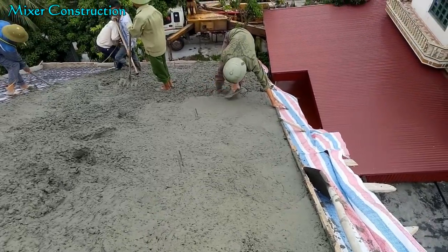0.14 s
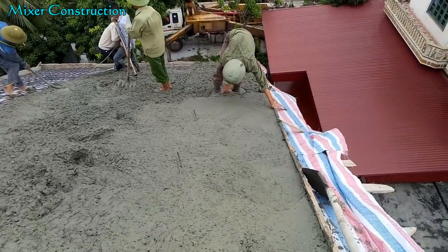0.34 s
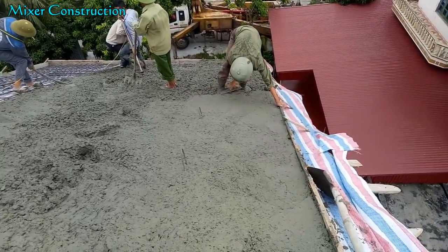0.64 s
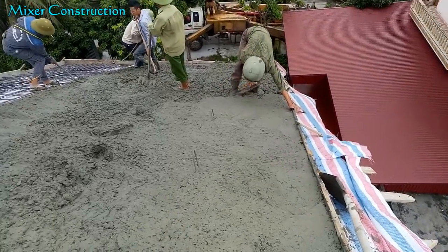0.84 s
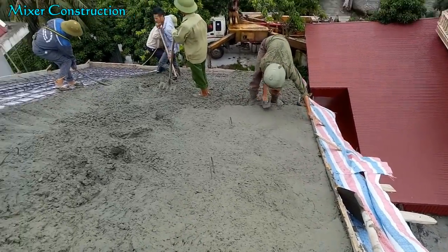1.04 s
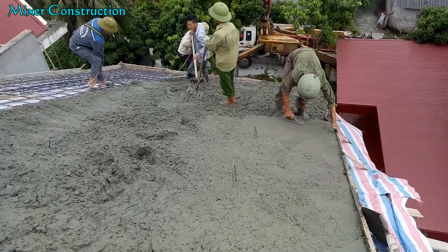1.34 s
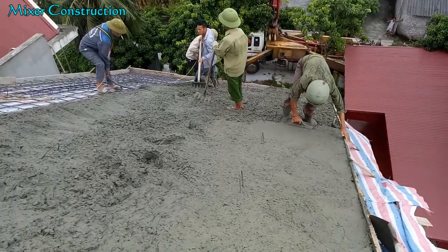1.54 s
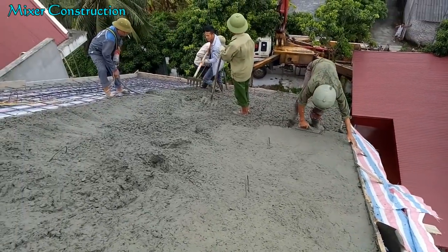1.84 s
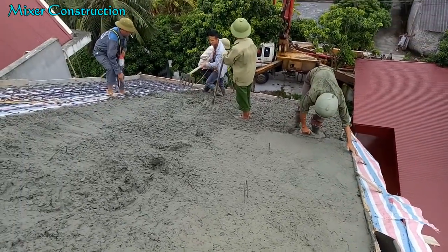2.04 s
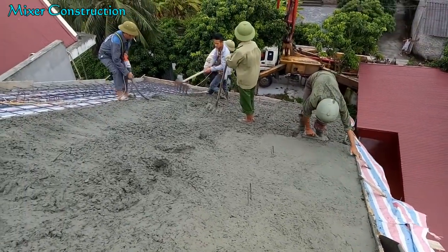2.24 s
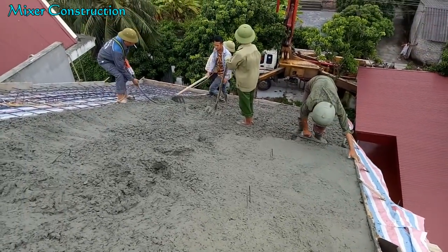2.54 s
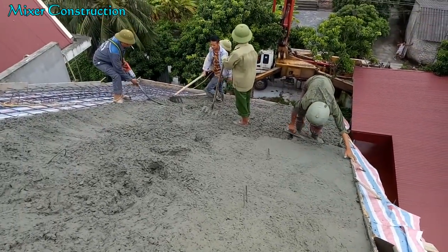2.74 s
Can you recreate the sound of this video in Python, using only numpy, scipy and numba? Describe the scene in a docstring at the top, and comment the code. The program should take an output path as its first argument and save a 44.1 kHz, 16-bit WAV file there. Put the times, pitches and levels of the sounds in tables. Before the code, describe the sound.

A concrete vibrator drones with a clear low hum and metallic rattle outdoors, slides down in pitch as it bogs, then revs back up; wind thumps the stereo microphone, whose right side grows muffled.

```python
"""A poker vibrator hums on a roof slab, slows as it sinks into wet concrete and climbs back towards speed.
Its eccentric sings a clean tone with overtones; a motor whine rides above; noise rattles in resonances.
Wind buffets two microphone ports; the right one is gradually covered and grows dull.
Late on come narrow-band gliding squeaks and short broad-band scrapes, each under a brief envelope."""
import sys
import numpy as np
from scipy import signal
from scipy.io import wavfile
from scipy.ndimage import uniform_filter1d, map_coordinates
from numba import njit

SR = 44100
rng = np.random.default_rng(int(sys.argv[2]) if len(sys.argv) > 2 else 0)


def undo_db(level):
    """Turn decibels back into plain size, where 20 dB means ten times bigger."""
    steps = np.asarray(level, float) / 20
    return 10 ** steps


def dump_mix(stems):
    """Bounce the given channels to the path in sys.argv[1] as a 16-bit WAV at rate SR."""
    frames = np.atleast_2d(stems).T  # one column per channel
    limited = np.clip(frames, -1, 1)  # hard clip at full scale
    pcm = np.round(limited * 32767).astype(np.int16)
    wavfile.write(sys.argv[1], SR, pcm)


N = 127890
TIME_S = np.arange(N) / SR

# Machine, squeak and scrape levels are ahead of the port gains; wind, buffets and hiss are added after them.
# Eccentric. Each row: time in seconds, mean rotation rate in Hz, tone in dB, octave in dB.
ECCENTRIC = [(0, 221.8, -25, -35), (.16, 220.4, -21, -41), (.8, 218.9, -17, -43.5),
             (.95, 217.2, -15.5, -38.5), (1.3, 216.3, -16, -34), (1.34, 215.6, -20, -34),
             (1.44, 213.3, -18, -28), (1.62, 214.3, -14.5, -41.5), (1.7, 200, -19.5, -35.5),
             (1.74, 193.3, -20, -39.5), (1.78, 185.2, -27, -33.5), (1.87, 170, -27, -38),
             (1.95, 158.9, -32.5, -38.5), (2.05, 143.9, -34, -35), (2.14, 129.5, -49, -53),
             (2.22, 122.9, -40, -38), (2.3, 149, -52, -41), (2.35, 161.8, -33.5, -50.5),
             (2.46, 187.4, -28, -46), (2.62, 203.8, -23.5, -46), (2.66, 206.1, -20.5, -36),
             (2.71, 201.1, -23, -35), (2.74, 207.5, -20.5, -30), (2.9, 211.3, -18, -37)]
# Upper overtones. Each row: time in seconds, third partial in dB, fourth partial in dB.
UPPER_PARTIALS = [(0, -42, -47), (.25, -40, -38.5), (.55, -40, -46), (.8, -40, -46.5), (.95, -62, -39.5),
                  (1.3, -41.5, -54.5), (2.1, -61, -54), (2.9, -48, -42)]
# Motor whine. Each row: time in seconds, level in dB.
WHINE_LEVEL = [(0, -45), (.9, -52), (1.3, -56.5), (1.6, -76)]
# Shaft and casing resonances. Each row: centre in Hz, nominal width in Hz, weight in dB.
RESONANCES = [(300, 72, -1), (654, 91, 1), (843, 130, 1.5), (1121, 258, 4), (1538, 160, -0.5),
              (1850, 290, -1.5), (1847, 58, -0.5), (2130, 500, -3), (2840, 640, 0.5), (3350, 990, -4.5),
              (4120, 780, -8.5), (5000, 1400, -18), (7000, 1500, -23)]
# Rattle course. Each row: time in seconds, level in dB, tilt in dB per octave about 1500 Hz.
RATTLE_LEVEL = [(0, -35, 1.5), (.5, -34.5, -0.5), (.72, -35, -0.25), (1.5, -35, -1.5), (1.8, -34, 0.5),
                (2.34, -34, 0.5), (2.5, -33.5, 2), (2.9, -34, -1)]
# Extra weight of the resonances near 1850 Hz. Each row: time in seconds, weight in dB.
RING_WEIGHT = [(0, -5), (1.2, 0), (1.5, 2), (2.05, -0.5), (2.3, -4.5), (2.65, 4.5)]
# Wind push. Each row: time in seconds, left port in dB, right port in dB.
WIND_LEVEL = [(0, -39, -13), (.12, -30.5, -18), (.22, -37, -24), (.33, -31.5, -17), (.45, -28.5, -23),
              (.54, -33.5, -23), (.68, -52.5, -17), (.76, -32, -28.5), (.95, -45, -26), (1.4, -35, -33),
              (1.65, -42, -35.5), (1.75, -33.5, -30.5), (1.86, -30, -32), (1.96, -28.5, -35),
              (2.04, -37.5, -29.5), (2.2, -30.5, -32), (2.33, -31, -31.5), (2.6, -23.5, -35),
              (2.7, -32, -28.5), (2.9, -39, -56)]
# Buffets on the right port. Each row: centre in seconds, half the peak in dB, frequency in Hz.
RIGHT_BUFFETS = [(0.039, -38, 250), (.1, -23, 219), (0.308, -18, 250), (0.354, -15, 360), (0.657, -15, 156),
                 (0.676, -21, 171), (0.928, -12, 300), (1.752, -15.5, 173), (2.147, -18.5, 149),
                 (2.196, -25, 148), (2.278, -19.5, 130), (2.481, -14.5, 148)]
# Squeaks. Each row: centre in seconds, length in seconds, from in Hz, to in Hz, level in dB.
SQUEAK_GLIDES = [(2.338, 0.12, 2450, 2700, -38), (2.376, 0.12, 3700, 4480, -44)]
# Scrapes. Each row: start in seconds, level in dB, length in seconds.
SCRAPE_BURSTS = [(2.562, -39, .02), (2.599, -29, .014), (2.617, -32, .02)]
# Left treble. Each row: time in seconds, share of rattle passing near 5 kHz in dB, thin hiss in dB.
LEFT_TREBLE = [(1.5, -20.5, -110), (1.8, -14.5, -80.5), (1.97, -14.5, -68), (2.25, -16, -81.5),
               (2.55, -2.5, -77.5), (2.68, -19, -66.5), (2.8, -10.5, -75.5)]
# Right port. Each row: time in seconds, corner of each low-pass in Hz, gain in dB,
# lead ahead of the low-passes in samples.
RIGHT_PORT = [(0, 9500, 4, 19), (.6, 8500, 1, 18.56), (.9, 4600, 2.5, 16.8), (1.15, 2000, -0.5, 23.6),
              (1.4, 950, -1.5, 29), (1.7, 760, -2.5, 21), (2., 600, -3.5, 26), (2.5, 600, -12.5, 39),
              (2.9, 680, -10, 49)]
# Machine noise reaching the right port. Each row: time in seconds, gain in dB.
RIGHT_NOISE_GAIN = [(0, 3), (.09, -1), (.23, 4), (.35, -2), (.5, 3.5), (.65, 1), (.69, -4)]

SPEED_WAVER_RATIO, TONE_FLICKER_DB, UPPER_FLICKER_DB = 0.0027, 0.52, 2.5
LABOUR_DB = 5.0  # extra flicker of the tone at half of top speed
WHINE_PER_TURN, WHINE_FLICKER_DB = 16.33, 3
GATE_DEPTH, GATE_DECAY_TURNS = 0.25, 0.31
PORT_UNLIKENESS = 0.47  # each port's own noise against the common noise
BAND_SWELL_DB, BAND_FLICKER_DB, RING_HZ = 1.0, 1.5, 1850.0
# pairs: left port, right port
WIND_HZ, WIND_WIDTH_HZ, GUST_DB = (92, 136.4), (115, 120), (2.0, 3.0)
GUSTS_PER_S, WIND_TOP_HZ, RUMBLE_HZ, RUMBLE_DB = 35.0, 600.0, 37.3, -42.5
BUFFET_CYCLES = 0.45
SQUEAK_WIDTH_HZ, SCRAPE_HZ, SCRAPE_WIDTH_HZ = 130.0, 1100.0, 1500.0
BOTH_PORTS_DB, RIGHT_TONE_DB, LEFT_TOP_HZ = 3.5, -6.5, 3726
AIR_HZ, AIR_WIDTH_HZ, TREBLE_SWING_DB = 5230, 1500, 2.5
HISS_HZ, HISS_WIDTH_HZ = 10700.0, 500.0


def columns(rows):
    """Every column after the first as a straight-line curve over time."""
    rows = np.array(rows, float)
    return [np.interp(TIME_S, rows[:, 0], c) for c in rows[:, 1:].T]


def unit(x):
    """Scales to an rms of 1."""
    return x / np.sqrt(np.mean(x ** 2))


@njit
def svf(x, hz, width):
    """State-variable filter with moving centre; returns band and low outputs."""
    band, low = np.empty(len(x)), np.empty(len(x))
    b, l = 0., 0.
    for i in range(len(x)):
        g = np.tan(np.pi * hz[i] / SR)
        k = width[i] / hz[i]
        v = (b + g * (x[i] - l)) / (1 + g * (g + k))
        low[i] = l + g * v
        band[i] = k * v
        b = 2 * v - b
        l = 2 * low[i] - l
    return band, low


def ring(x, hz, width_hz):
    """A resonance applied twice, steep on both sides."""
    hz = hz + np.zeros(N)
    stage_width_hz = 1.452 * width_hz + np.zeros(N)  # two passes narrow the band
    once = svf(x, hz, stage_width_hz)[0]
    return svf(once, hz, stage_width_hz)[0]


def walk(rate_per_s):
    """Random levels, held and then slewed; spread near 1."""
    hold = int(SR / rate_per_s)
    steps = np.repeat(rng.standard_normal(N // hold + 1), hold)
    return 1.46 * uniform_filter1d(uniform_filter1d(steps, hold), hold)[:N]


def tones(hz, turns):
    """The eccentric's tone, one cycle a turn, flickering more when slowed, with flickering overtones."""
    _, tone_db, octave_db = columns(ECCENTRIC)
    third_db, fourth_db = columns(UPPER_PARTIALS)
    flicker_db = TONE_FLICKER_DB + LABOUR_DB * 2 * (1 - hz / hz.max())
    out = undo_db(tone_db + flicker_db * walk(29.975)) * np.sin(2 * np.pi * turns)
    partials = ((2, octave_db, 0.5), (3, third_db, 1), (4, fourth_db, 1))
    for multiple, db, flicker_share in partials:
        level = undo_db(db + UPPER_FLICKER_DB * flicker_share * walk(45))
        out += level * np.cos(2 * np.pi * multiple * turns)
    return np.sqrt(2) * out


def whine(turns):
    """A thin motor whine locked to the rotation, quivering fast, that fades."""
    level = undo_db(columns(WHINE_LEVEL)[0] + WHINE_FLICKER_DB * walk(60))
    return np.sqrt(2) * level * np.sin(2 * np.pi * WHINE_PER_TURN * turns)


def rattle(turns):
    """Noise partly gated once a turn, through shaft and casing resonances; two partly alike copies."""
    level_db, tilt = columns(RATTLE_LEVEL)
    ring_db = columns(RING_WEIGHT)[0]
    gate = 1 - GATE_DEPTH + GATE_DEPTH * unit(np.exp(-(turns % 1) / GATE_DECAY_TURNS))
    out = np.zeros((2, N))
    for hz, width_hz, weight_db in RESONANCES:
        common, left, right = rng.standard_normal((3, N))
        gain_db = weight_db + ring_db * (abs(hz - RING_HZ) < 150) + tilt * np.log2(hz / 1500)
        gain_db = gain_db + BAND_SWELL_DB * walk(4.8) + BAND_FLICKER_DB * walk(16)
        bands = [ring(gate * (common + PORT_UNLIKENESS * own), hz, width_hz) for own in (left, right)]
        out += undo_db(gain_db) * np.array(bands) / np.sqrt(width_hz / 200)
    return unit(out) * undo_db(level_db)


def wind():
    """Unrelated gusty low noise on each port, over a steady deep rumble."""
    out = []
    soften = signal.butter(2, WIND_TOP_HZ, fs=SR, output="sos")
    for db, hz, width_hz, gust_db in zip(columns(WIND_LEVEL), WIND_HZ, WIND_WIDTH_HZ, GUST_DB):
        push = rng.standard_normal(N) * undo_db(db + gust_db * walk(GUSTS_PER_S))
        push = signal.sosfilt(soften, ring(push, hz, width_hz)) * np.sqrt(SR / 2 / width_hz)
        rumble = ring(rng.standard_normal(N) * undo_db(RUMBLE_DB), RUMBLE_HZ, RUMBLE_HZ)
        out.append(push + rumble * np.sqrt(SR / 2 / RUMBLE_HZ))
    return np.array(out)


def buffets():
    """Sharp blows of wind on the right port: about one cycle under a bell-shaped envelope."""
    out = np.zeros(N)
    for centre_s, db, hz in RIGHT_BUFFETS:
        cycles = (TIME_S - centre_s) * hz
        bell = np.exp(-(cycles / BUFFET_CYCLES) ** 2)
        out += 2 * undo_db(db) * bell * np.cos(2 * np.pi * cycles + 1)
    return out


def squeaks():
    """Soft, wavering squeaks, narrow noise gliding up as the shaft picks up."""
    out = np.zeros(N)
    for centre_s, length_s, from_hz, to_hz, db in SQUEAK_GLIDES:
        u = (TIME_S - centre_s) / length_s
        hz = from_hz + (to_hz - from_hz) * np.clip(u + 0.5, 0, 1)
        noise = unit(ring(rng.standard_normal(N), hz, SQUEAK_WIDTH_HZ))
        out += undo_db(db) * np.exp(-(2 * u) ** 2) * noise
    return out


def scrapes():
    """Short rasps of a tool on the slab: broad-band noise starting and stopping sharply."""
    envelope = np.zeros(N)
    for start_s, db, length_s in SCRAPE_BURSTS:
        half_s = length_s / 2
        envelope += undo_db(db) * np.exp(-((TIME_S - start_s - half_s) / half_s) ** 4)
    return envelope * unit(ring(rng.standard_normal(N), SCRAPE_HZ, SCRAPE_WIDTH_HZ))


def left_port(tone, noise, shaft):
    """Sound cut steeply at the port's top, plus a share of rattle treble that rises and falls, and a hiss."""
    share_db, hiss_db = columns(LEFT_TREBLE) + TREBLE_SWING_DB * walk(22)
    steep = signal.cheby1(5, .3, LEFT_TOP_HZ, fs=SR, output="sos")
    low = signal.sosfiltfilt(steep, tone + noise)
    air = undo_db(share_db) * ring(shaft, AIR_HZ, AIR_WIDTH_HZ)
    hiss = undo_db(hiss_db) * unit(ring(rng.standard_normal(N), HISS_HZ, HISS_WIDTH_HZ))
    return (low + air) * undo_db(BOTH_PORTS_DB) + hiss


def right_port(tone, noise):
    """Sound read ahead, then dulled by three low-passes whose corner falls as the port is covered."""
    corner_hz, gain_db, lead = columns(RIGHT_PORT)
    mix = tone * undo_db(RIGHT_TONE_DB) + noise * undo_db(columns(RIGHT_NOISE_GAIN)[0])
    out = map_coordinates(mix, [np.arange(N) + lead], mode="nearest")
    for damping in (1.5, 2.2, 1.):
        out = svf(out, corner_hz, damping * corner_hz)[1]
    return out * undo_db(gain_db + BOTH_PORTS_DB)


def scene():
    """One rotation drives tone, whine and rattle; each port filters the machine, then wind is added."""
    hz = columns(ECCENTRIC)[0] * (1 + SPEED_WAVER_RATIO * walk(12))
    turns = np.cumsum(hz) / SR
    tone = tones(hz, turns)
    shaft = rattle(turns)
    noise = shaft + whine(turns) + squeaks() + scrapes()
    ports = np.array([left_port(tone, noise[0], shaft[0]), right_port(tone, noise[1])])
    ports += wind()
    ports[1] += buffets()
    return ports


def low_pass(x):
    """Removes everything above the highest recorded frequency."""
    return signal.sosfilt(signal.butter(12, 11950, fs=SR, output="sos"), x)


def record(dry):
    """The microphones lose the deepest bass; the wind-blown right one rounds its peaks."""
    high_pass = signal.butter(2, 45, "high", fs=SR, output="sos")
    left, right = signal.sosfilt(high_pass, dry)
    right = 0.58506 * np.tanh(right / 0.6006)
    return low_pass(np.array([left, right]))


dry = scene()
out = record(dry)
dump_mix(out)
```